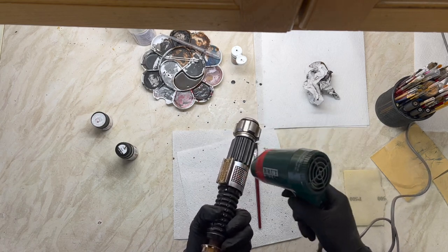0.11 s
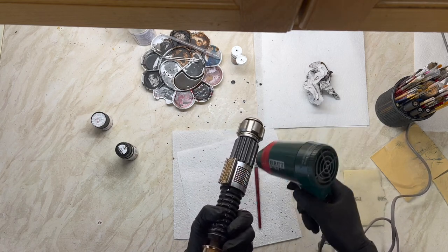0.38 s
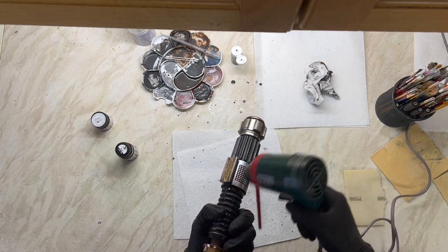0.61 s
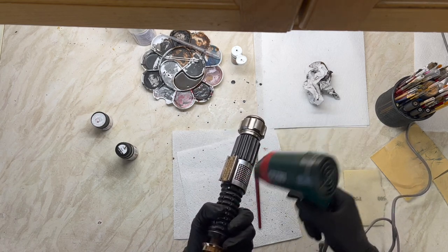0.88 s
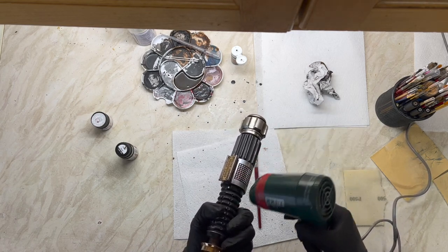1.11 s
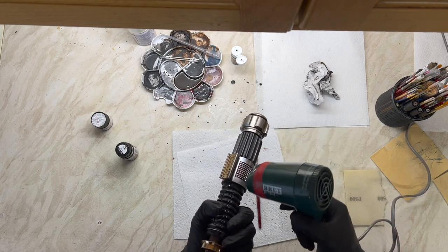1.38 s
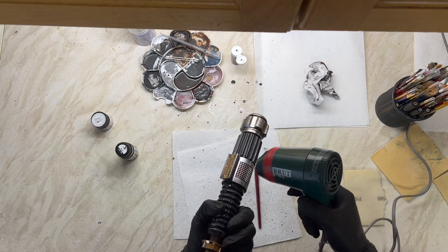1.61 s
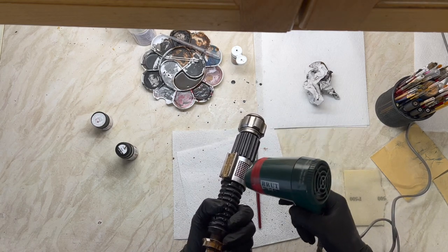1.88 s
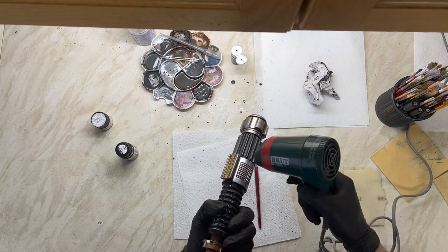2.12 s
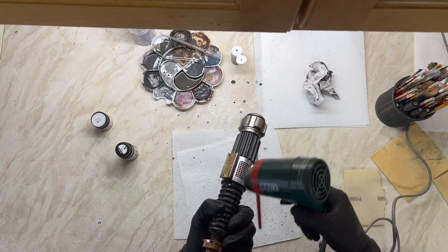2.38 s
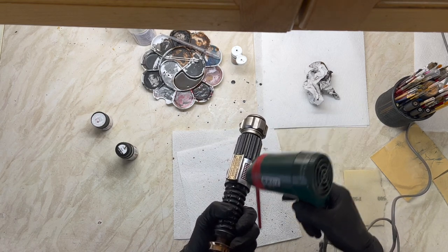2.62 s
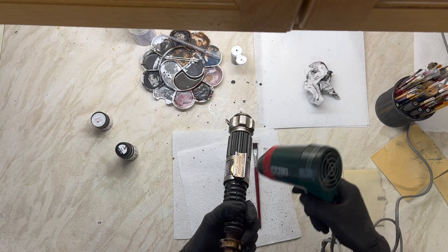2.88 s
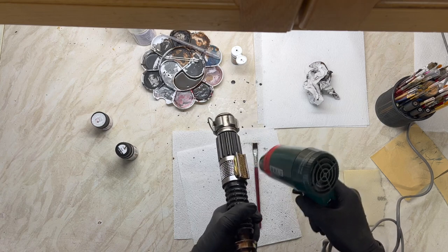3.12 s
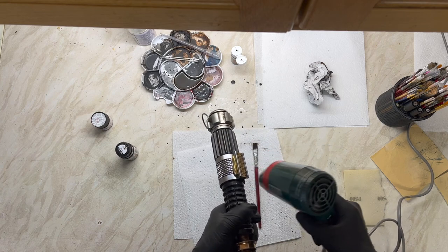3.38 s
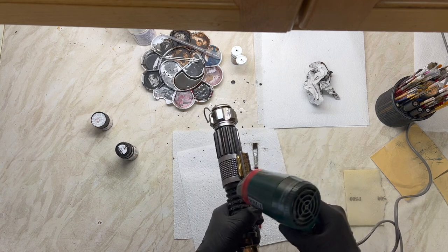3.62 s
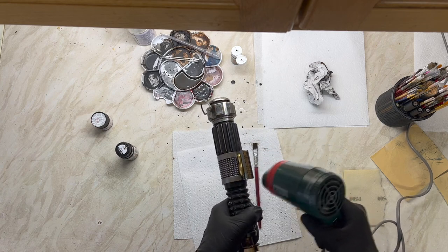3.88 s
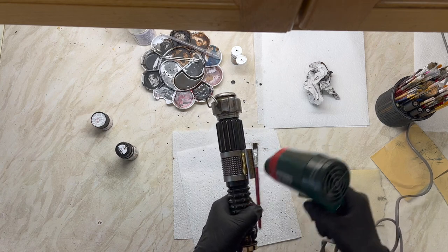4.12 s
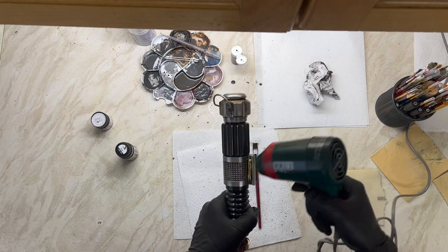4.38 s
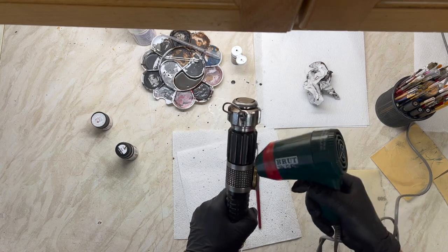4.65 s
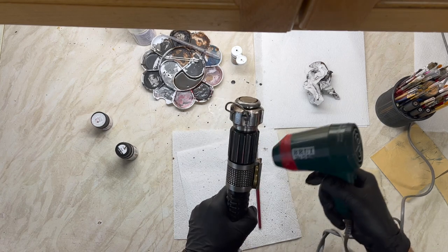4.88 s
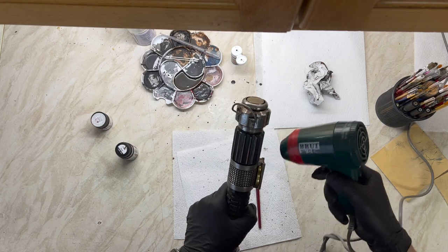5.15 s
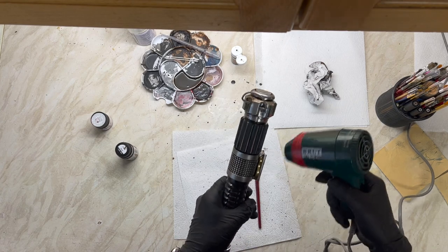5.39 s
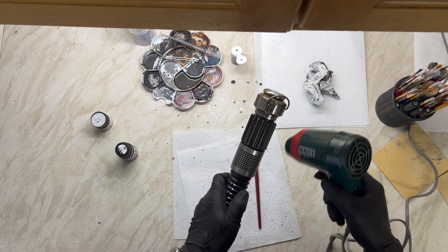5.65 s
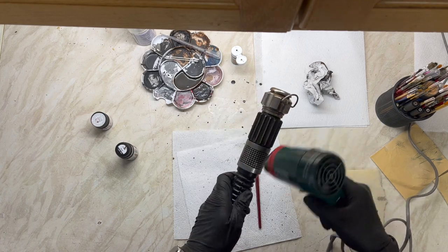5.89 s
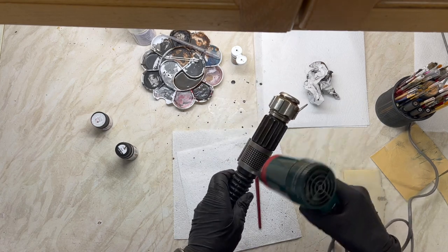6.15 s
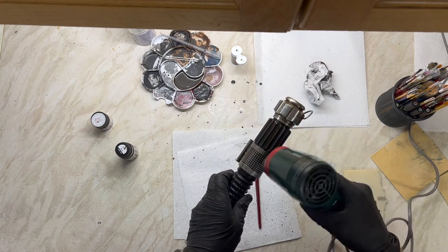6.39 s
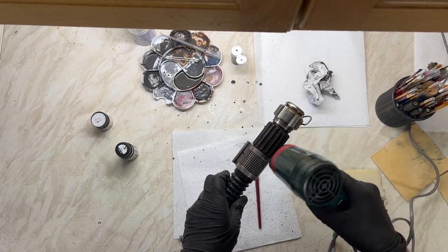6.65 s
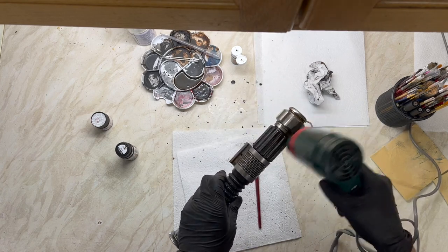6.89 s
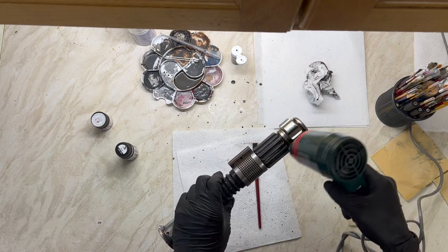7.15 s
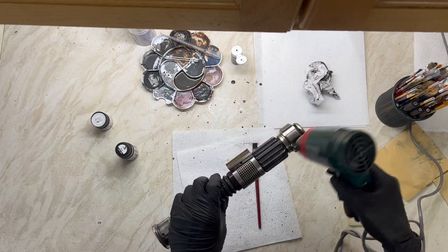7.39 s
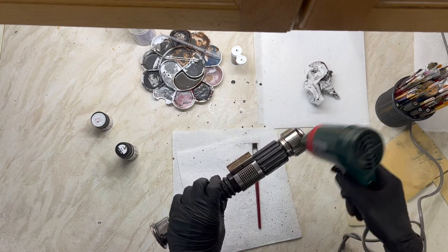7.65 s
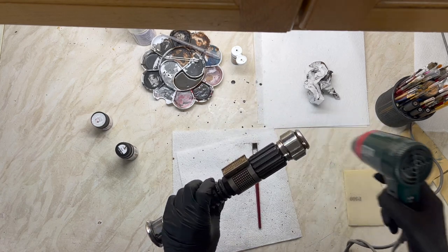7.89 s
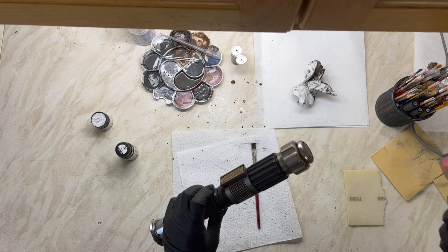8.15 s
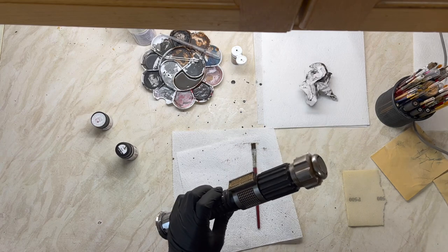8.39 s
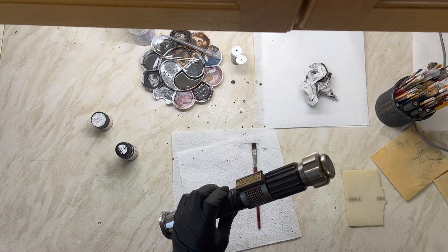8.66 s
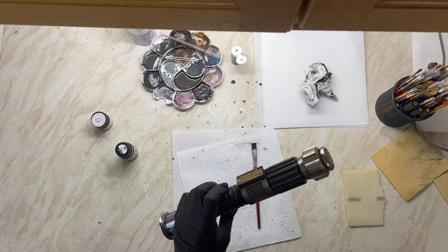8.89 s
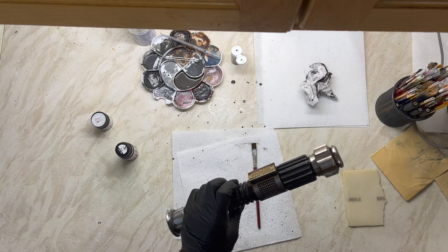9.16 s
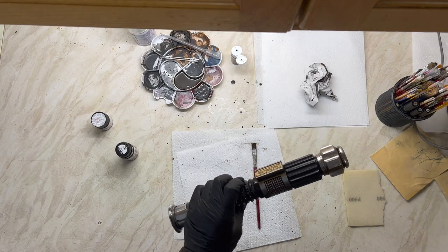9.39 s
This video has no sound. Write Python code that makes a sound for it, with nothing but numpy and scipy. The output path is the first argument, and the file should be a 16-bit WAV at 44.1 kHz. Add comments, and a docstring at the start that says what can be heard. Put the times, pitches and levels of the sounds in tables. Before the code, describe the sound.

A handheld hot-air blower roars and whines steadily, its hiss wavering as it is waved, then switches off and is set down with a hollow knock.

```python
"""Hot-air blower over a work table

A motor's hum and whine, fan-blade tones, a roar ringing in the housing and a jet hissing on an object are
heard in two channels: turbulence is shaped noise, rotation is sines tied to the shaft. The blower is waved
about, switched off and dies away into faint shuffling, a rustle of noise with short notes and ticks.
It is then set down with a hollow knock and two weaker bounces, which ring decaying modes of the table top.
"""
import sys
import numpy as np
from scipy import signal
from scipy.io import wavfile
from scipy.ndimage import uniform_filter1d

SR = 44100
rng = np.random.default_rng(int(sys.argv[2]) if len(sys.argv) > 2 else 0)


def unload_wav(signal):
    """Save mono or channel-first audio to the path in sys.argv[1] as 16-bit WAV at rate SR, clipped to [-1, 1]."""
    wavfile.write(
        sys.argv[1],
        SR,
        np.round(np.clip(np.atleast_2d(signal).T, -1, 1) * 32767).astype(np.int16),
    )


def invert_db(level):
    """Linear amplitude ratio for a level in decibels (20 dB per decade), elementwise."""
    return 10 ** (np.asarray(level, dtype=float) / 20)


N = 419814  # length in samples
OFF_S = 8.479  # the blower is switched off


def evened(x):
    """Normalization by the root mean square, to rms 1."""
    return x / np.sqrt(np.mean(x ** 2) + 1e-20)


def read(points, hz):
    """Interpolation on a logarithmic frequency axis: a spectrum table's columns at hz."""
    f, *columns = np.transpose(points)
    return np.squeeze([np.interp(np.log(hz + 1), np.log(f + 1), c) for c in columns])


def follow(points):
    """Linear interpolation in time: a time table's columns at every sample, ends held."""
    s, *columns = np.transpose(points)
    return np.squeeze([np.interp(np.arange(N) / SR, s, c) for c in columns])


def drift(top_hz):
    """Low-passed Gaussian noise: a slow random modulation of rms 1."""
    return evened(signal.lfilter(*signal.butter(2, top_hz, fs=SR), rng.standard_normal(N)))


def ports(hz):
    """Spatial coherence: likeness, phase lead in rad and balance in dB of two microphone ports."""
    # f/Hz, likeness/0-1, lead of left/rad, left minus right level/dB
    port_pairing = [(60, 0.98, -0.22, -0.5), (400, 0.93, 0.46, 0.5), (650, 0.75, 0, 0),
                    (910, 0.76, -0.43, 0.5), (1160, 0.58, -1, 0), (1440, 0.45, -1.53, 1),
                    (1756, 1, -0.8, 2), (3030, 0.64, -0.3, 1.5), (4620, 0.86, -0.5, 1),
                    (5450, 0.22, 1.2, 2), (7450, 0.56, -3, 2.5)]
    # treble, one sound in turn opposite and in step: f/Hz, likeness/0-1, lead of left/half turns
    treble_pairing = [(7600, .999, -1), (8900, .999, -1), (9300, .75, -1.2), (10300, .65, -1.6),
                      (10700, .999, -2), (13000, .999, -2), (13600, .8, -2.2), (14100, .4, -2.5),
                      (14600, .99, -3)]
    treble = [(f, same, np.pi * half_turns, 0) for f, same, half_turns in treble_pairing]
    return read(port_pairing + treble, hz)


def rush(gain, size, patchy_db):
    """Turbulence as filtered noise: gain(hz) shapes random short-time spectra, partly shared by the ports."""
    hz, hop = np.fft.rfftfreq(size, 1 / SR), size // 4
    a, b, c, d, patches = rng.standard_normal((N // hop + 5, len(hz), 5)).T
    # patches of excess level, smoothed over frequency and then time
    patches = uniform_filter1d(patches, size // 64, 0)
    patches = uniform_filter1d(patches, 4096 // hop, 1)
    same, lead, pan_db = ports(hz)[:, :, None]
    same = np.clip(same, 0, 1)
    left = a + 1j * b
    shared = same * left * np.exp(-1j * lead)
    right = shared + np.sqrt(1 - same ** 2) * (c + 1j * d)
    z = np.array([left * invert_db(pan_db / 2), right / invert_db(pan_db / 2)])
    z *= gain(hz)[..., None] * invert_db(patchy_db * evened(patches))
    noise = signal.istft(z, nperseg=size, noverlap=size - hop)[1]
    return evened(noise[:, :N])


def ringing(hz, modes, broad_db=-70):
    """Resonance: peaks, a level for each port, add in power to a broad spectrum."""
    power = invert_db(broad_db) ** 2
    for f, width, left, right in modes:
        power = power + invert_db([[left], [right]]) ** 2 / (1 + (2 * (hz - f) / width) ** 2) ** 2
    return np.sqrt(power)


def swings():
    """Superposition of raised-cosine dips in jet and blade tone as the nozzle swings off the object."""
    # t/s of the middle, length/s, jet dip/dB, blade-tone dip/dB (negative is a rise)
    swing_dips = [(0.054, 0.31, 1.5, 14), (0.38, 0.19, 2.5, 17), (0.67, 0.15, 3, 12), (0.945, .2, 2, 12),
                  (1.57, .25, 1.5, 3.5), (2.047, 0.42, 2, 5), (2.517, 0.25, 1.5, 4), (2.84, .15, 3.5, 3),
                  (3.097, 0.13, 1, 5), (3.35, 0.36, 0, 3), (4.02, 0.3, 0, 10), (4.43, 0.18, 2, 5),
                  (5.1, .2, 0.5, 2), (5.696, 0.19, 3.5, 3), (5.986, .18, 3, 7), (6.274, 0.16, 4, -3),
                  (6.53, 0.18, 2.5, 14), (6.804, 0.19, 6, 0), (7.06, 0.26, 4, 9), (7.285, 0.27, 2.5, 7),
                  (7.577, .22, 4, 11), (7.865, .2, 2, 3), (8.3, .25, 1.5, 3)]
    t, out = np.arange(N) / SR, np.zeros((2, N))
    for s, length, jet_db, blade_db in swing_dips:
        dip = np.cos(np.pi * np.clip((t - s) / length, -.5, .5)) ** 2
        out += np.outer([jet_db, blade_db], dip)
    return out


def held(law):
    """Addition of gains in dB: a layer's level as the blower is turned, aimed, drawn away and swung."""
    # how it is held: t/s, turned side-on/0-1, aimed at the object's open end/0-1, drawn away/0-1
    holding = [(0, 0.07, 0.3, 0), (1.2, 0.35, 0.37, 0.01), (2.5, 0.45, 0.34, 0), (3.0, 0.2, 0.33, 0.04),
               (3.5, 0.04, 0.45, 0.08), (4.1, 0.13, 0.3, 0), (4.5, 0.92, 0.34, 0.09), (5.2, .9, 0.1, 0.12),
               (5.55, 0.66, 0.4, 0), (5.85, 0, 0.65, 0), (6.6, 0, 0.44, 0.04), (6.93, 0.13, 0.87, 0.09),
               (7.5, 0.47, 0.74, 0.12), (7.9, 0.35, 0.55, 0.22), (8.05, 0.33, 0.9, 1),
               (8.25, 0.43, 0, 0.86), (8.47, 0.45, 0, 1)]
    plain_db, *changes_db, share, waver_db = law
    steady_db = plain_db + np.dot(changes_db, follow(holding))
    return steady_db - share * swings()[0] + waver_db * drift(9)


def coasting(fall_db_per_s, linger_db, linger_fall_db_per_s):
    """Exponential decay in two stages after the switch: a fast fall, then a lingering one as the fan coasts."""
    t = np.arange(N) / SR
    since = (t - OFF_S).clip(0)
    decay_db = np.maximum(-fall_db_per_s * since, linger_db - linger_fall_db_per_s * since)
    hush_db = 450 * (t - 9.13).clip(0)  # the blower hushes just before the knock
    return decay_db - hush_db


# The two laws in roar() and those of the other layers list: plain level/dB, change side-on/dB,
# change at the open end/dB, change drawn away/dB, share of a swing's jet dip, waver/dB rms.


def roar():
    """Broadband fan turbulence with resonant peaks: steady rings and rings that swell when side-on, apart."""
    # broad roar: f/Hz, relative level per Hz/dB
    roar_spectrum = [(30, -58), (50, -35.5), (130, -25.5), (260, -15.5), (460, -19), (700, -13.5),
                     (1000, -5.5), (1300, -8.5), (1700, -14.5), (2300, -18.5), (2800, -22.5), (4000, -35.5)]
    # narrow peaks in the roar, the highest a thin one at 2474 Hz:
    # f/Hz, width at -6 dB/Hz, left level/dB, right level/dB
    steady_rings = [(225, 11, -40, -41), (375, 35, -13.5, -14), (614.5, 80, -8, -9.5),
                    (856, 41.5, -1.5, 1.5), (946.5, 39, 0, -4.5), (1077, 29.7, 4, 5), (1182, 52, 1, -3),
                    (1263, 16, -6, -1), (1990, 23, -19, -20), (2110, 50, -11, -12.5), (2474, 37, -10, -13)]
    # peaks that swell when side-on: f/Hz, width at -6 dB/Hz, left level/dB, right level/dB
    swelling_rings = [(1320.4, 26, 0.5, 3), (1416, 84, -9.5, -4.5), (1475, 33, -6, -4.5),
                      (1680, 105, -24.5, -14)]
    # level laws, columns as above
    steady_law = (-25, .5, -1, -3, 0.14, .5)
    swelling_law = (-37.5, 10.5, 2.5, -1.5, -1.15, 1.5)
    off_db = coasting(79, -22.5, 8.9)
    steady = rush(lambda hz: ringing(hz, steady_rings, read(roar_spectrum, hz)), size=4096, patchy_db=1.0)
    swelling = rush(lambda hz: ringing(hz, swelling_rings), size=4096, patchy_db=1.8)
    return invert_db(held(steady_law) + off_db) * steady + invert_db(held(swelling_law) + off_db) * swelling


def whistle():
    """Narrow-band noise: turbulence through one resonance gives a fuzzy whistle."""
    # f/Hz, width at -6 dB/Hz, left level/dB, right level/dB
    whistle_ring = [(2279, 73, -1.5, 2.5)]
    # level law, columns as above
    whistle_law = (-46, -4.5, 12, -7.5, 1, 2.5)
    noise = rush(lambda hz: ringing(hz, whistle_ring), size=2048, patchy_db=1.5)
    return invert_db(held(whistle_law) + coasting(87, -24, 28)) * noise


def jet():
    """Impingement noise: the jet breaks on the object as a flickering band of noise."""
    # f/Hz, relative level per Hz/dB
    jet_spectrum = [(1800, -21.5), (2500, -6), (2800, -4.5), (3150, -1.5), (3500, 0.5), (4300, -4.5),
                    (5200, -10.5), (7000, -20)]
    # level law, columns as above
    jet_law = (-32.5, -6, -0.5, -4, 1.5, 0.5)
    noise = rush(lambda hz: invert_db(read(jet_spectrum, hz)), size=1024, patchy_db=1.5)
    return invert_db(held(jet_law) + coasting(87, -24, 28) + 0.29 * drift(22)) * noise


def hiss():
    """Small-scale turbulence: the nozzle gives flickering high-frequency noise."""
    # f/Hz, relative level per Hz/dB
    hiss_spectrum = [(3000, -11), (5000, 1), (6800, -1), (9000, 1.5), (11000, -4), (13500, -10),
                     (15000, -23), (16000, -21)]
    # level law, columns as above
    hiss_law = (-35.5, -2, 1.5, -1, -0.02, .6)
    noise = rush(lambda hz: invert_db(read(hiss_spectrum, hz)), size=512, patchy_db=1.65)
    return invert_db(held(hiss_law) + coasting(130, -6.5, 39) + 0.47 * drift(17.0)) * noise


def hollow():
    """Cavity resonance: the housing's main hollow keeps sounding while the fan coasts."""
    # f/Hz, width at -6 dB/Hz, left level/dB, right level/dB
    cavity = [(1172, 150, 0.5, -0.5), (934, 120, -4.5, -4)]
    noise = rush(lambda hz: ringing(hz, cavity), size=2048, patchy_db=1.5)
    return invert_db(-37 + coasting(40, -16, 8)) * noise


def tones():
    """Periodic sources locked to rotation: blade passing, shaft unbalance, commutator whine; and mains hum."""
    # shaft speed until the switch: t/s, f/turns per s
    shaft_speed = [(0, 297.1), (3, 297.6), (6, 298.1), (8.5, 297.9)]
    # commutator whine: f/multiples of the shaft
    whine_orders = [23, 30, 40]
    # whine: level/dB
    whine_levels = [-67, -58, -57.5]
    # left minus right level/dB of three blade tones, shaft, hum and three whines
    tone_balance = [3, 3, 14, 1, 1, 2, 14, -1]
    # level laws of the blade tone, its 2nd and 3rd multiple, columns as above
    blade_laws = [(-38.5, 1.5, 2, -22, 0, 1.56), (-41.5, -13, 3, 1.5, 3, 1.85), (-53.5, 0, -4, -4, -1, 3.3)]
    blades = 6
    shaft = follow(shaft_speed) * (1 + .0011 * drift(4) + .0007 * drift(30))
    slowing_per_s = .6  # exponential rate after the switch
    shaft *= np.exp(-slowing_per_s * (np.arange(N) / SR - OFF_S).clip(0))
    blade_db, *multiples_db = map(held, blade_laws)
    pitches = [blades * shaft, 2 * blades * shaft, 3 * blades * shaft]
    levels_db = [blade_db - swings()[1], *multiples_db]
    pitches += [shaft, 100 + 0 * shaft]  # unbalance, and hum at a steady 100 Hz
    levels_db += [-45.5 + 2.3 * drift(5.2), -57.5 + 3.1 * drift(3.2)]
    pitches += [order * shaft for order in whine_orders]
    levels_db += [db + 2.5 * drift(4) for db in whine_levels]
    out = np.zeros((2, N))
    for hz, db, pan_db in zip(pitches, levels_db, tone_balance):
        phase = 2 * np.pi * np.cumsum(hz) / SR
        lead = ports(hz.mean())[1]
        balance = invert_db([[pan_db / 2], [-pan_db / 2]])
        out += np.sqrt(2) * invert_db(db) * balance * np.sin([phase, phase - lead])
    return out * invert_db(coasting(180, -30, 60))


def shuffling():
    """Friction of hands and cable: a dull noise rustle throughout, with late thin notes and small ticks."""
    # rustle, first level held from the start: t/s, level/dB
    rustle_levels = [(8.8, -52), (8.92, -50.5), (9.03, -48), (9.12, -52), (9.16, -65), (9.2, -45),
                     (9.3, -58), (9.36, -63), (9.41, -59), (9.52, -68)]
    # rustle: f/Hz, relative level per Hz/dB
    rustle_spectrum = [(50, -12), (200, 1.5), (420, 0.5), (800, -9.5), (1500, -18), (3000, -21),
                       (6000, -26.5), (14000, -33)]
    # faint notes: start t/s, end t/s, f/Hz, level/dB
    faint_notes = [(8.89, 9.22, 764, -57), (9.01, 9.15, 420, -59), (8.94, 9.1, 2740, -67),
                   (9.21, 9.29, 1696, -65)]
    # ticks: t/s, level/dB
    small_ticks = [(8.896, -57), (8.955, -51), (9.032, -53), (9.37, -63)]
    rustle = rush(lambda hz: invert_db(read(rustle_spectrum, hz)), size=512, patchy_db=2.2)
    out = invert_db(follow(rustle_levels)) * rustle
    t = np.arange(N) / SR
    for start, end, hz, db in faint_notes:
        progress = np.clip((t - start) / (end - start), 0, 1)
        swell = np.sin(np.pi * progress ** .6) ** .5
        waver = 1 + .005 * drift(25)
        broken_db = 2 * drift(20)
        note = np.sin(2 * np.pi * hz * np.cumsum(waver) / SR)
        out += np.sqrt(2) * invert_db(db + broken_db) * swell * note
    band = signal.butter(1, [1800, 4500], "band", fs=SR)
    crackle = evened(signal.lfilter(*band, rng.standard_normal((2, N))))
    # each tick falls 60 dB in 0.06 s
    envelope = sum(invert_db(db - 60 * (t - s).clip(0) / 0.06) * (t > s) for s, db in small_ticks)
    return out + crackle * envelope


def knocks():
    """Modal excitation: each soft blow rings the table, with a plastic tick scattered off the walls."""
    # t/s, blow level/dB, tick level/dB
    blows = [(9.1942, -13, -36.5), (9.216, -28, -49), (9.238, -40, -48)]
    # table-top modes: f/Hz, relative level/dB, time to fall 60 dB/s
    table_modes = [(106, -19, 0.28), (148, -17.5, 0.5), (177.5, -15, 0.36), (225, 1.5, 0.14),
                   (265, -5, 0.36), (250, 10, 0.063), (295, -4, 0.093), (338, -6.5, 0.14), (875, -30, .06),
                   (1240, -20, 0.065)]
    t = np.arange(SR // 2) / SR
    ring = sum(invert_db(db - 60 * t / t60) * np.sin(2 * np.pi * hz * t) for hz, db, t60 in table_modes)
    ring *= 1 - np.exp(-t / 0.0036)  # the blower's weight lands over a few ms
    ring /= abs(ring).max()
    scatter = signal.lfilter([1], [1, -.8], rng.standard_normal((2, len(t))))
    tick = evened(scatter) * (invert_db(-60 * t / .03) + invert_db(-15.5 - 60 * t / 0.39))
    # the room answers with a blurred boom
    band = signal.butter(2, [90, 380], "band", fs=SR)
    boom = evened(signal.lfilter(*band, rng.standard_normal(len(t))))
    ring += invert_db(-28.5 - 60 * t / 0.5) * (1 - np.exp(-t / 0.033)) * boom
    out = np.zeros((2, N + len(t)))
    for s, blow_db, tick_db in blows:
        at, tick_at = round(s * SR), round((s - .002) * SR)  # the tick leads by 2 ms
        out[:, at:at + len(t)] -= invert_db(blow_db) * ring
        out[:, tick_at:tick_at + len(t)] += invert_db(tick_db) * tick
    return out[:, :N]


def scene():
    """Superposition of all sources."""
    air = roar() + whistle() + jet() + hiss() + hollow()
    return air + tones() + shuffling() + knocks()


def low_pass(x):
    """Removes everything above the highest recorded frequency."""
    return signal.sosfilt(signal.butter(12, 14770, fs=SR, output="sos"), x)


def record(dry):
    """High-pass filtering: the bass below 42 Hz falls away steeply."""
    bass_cut = signal.butter(4, 42, "high", fs=SR, output="sos")
    mix = signal.sosfilt(bass_cut, dry)
    return low_pass(mix)


dry = scene()
out = record(dry)
unload_wav(out)
```